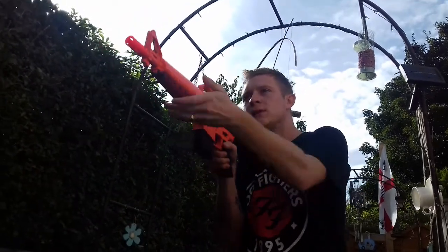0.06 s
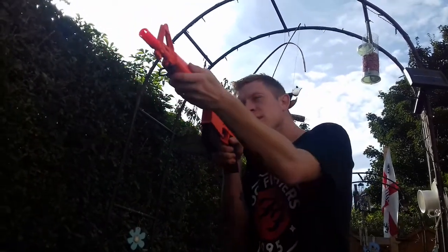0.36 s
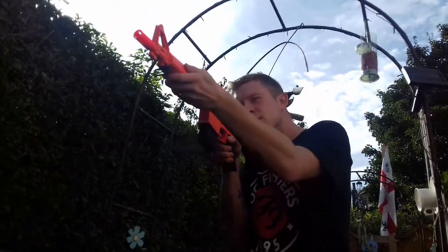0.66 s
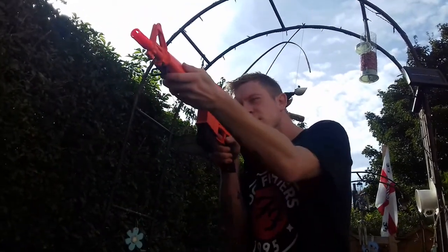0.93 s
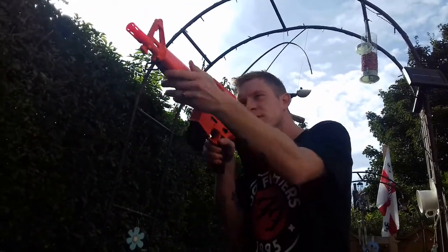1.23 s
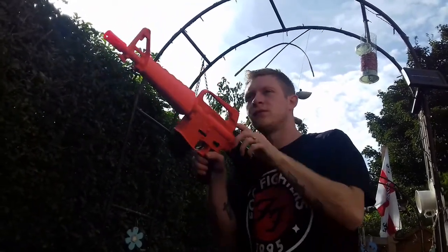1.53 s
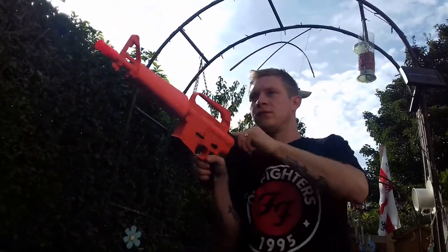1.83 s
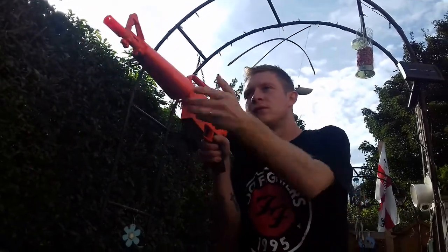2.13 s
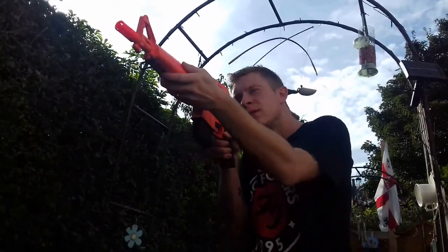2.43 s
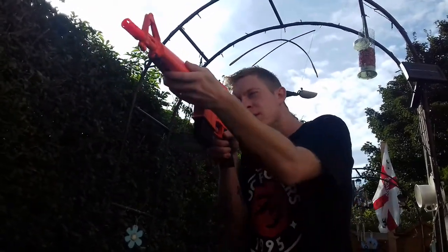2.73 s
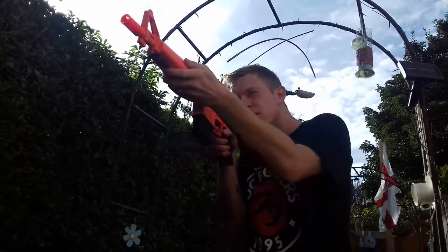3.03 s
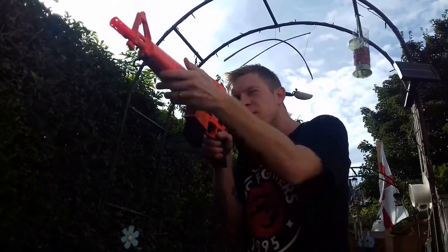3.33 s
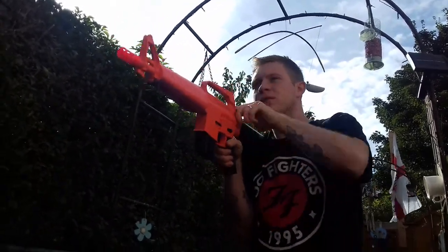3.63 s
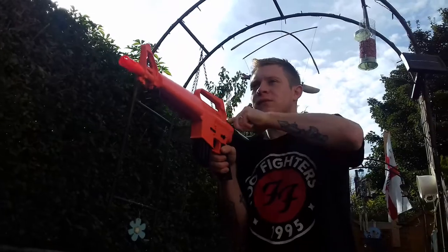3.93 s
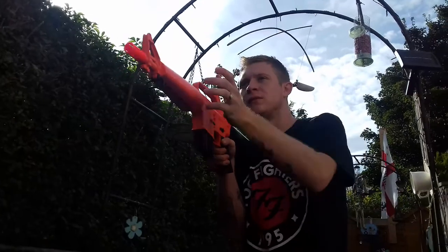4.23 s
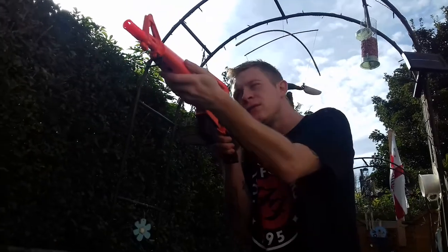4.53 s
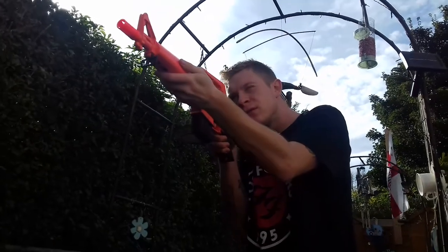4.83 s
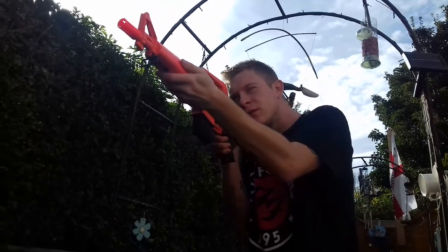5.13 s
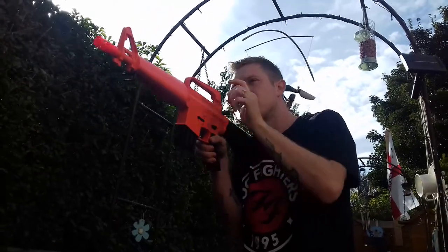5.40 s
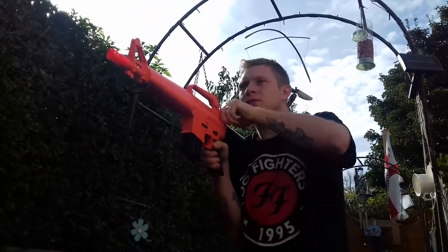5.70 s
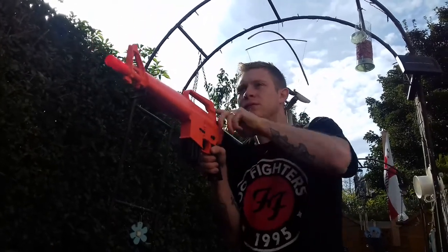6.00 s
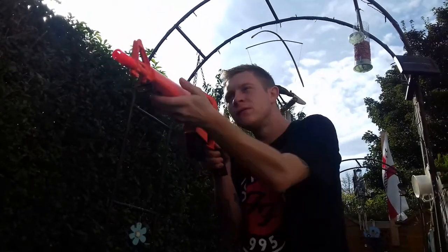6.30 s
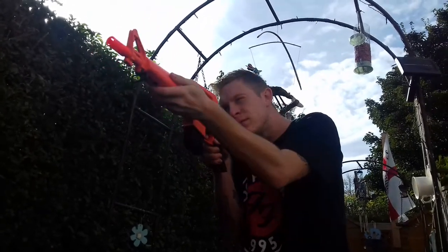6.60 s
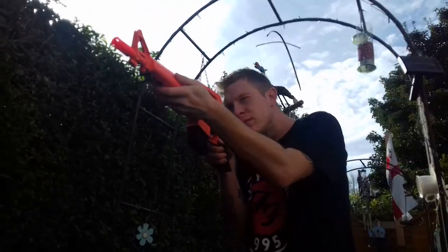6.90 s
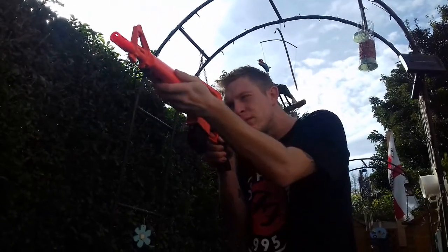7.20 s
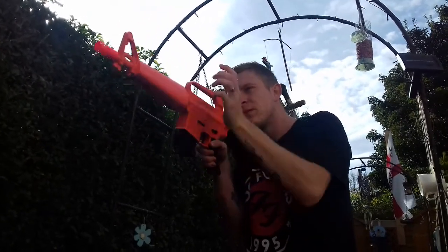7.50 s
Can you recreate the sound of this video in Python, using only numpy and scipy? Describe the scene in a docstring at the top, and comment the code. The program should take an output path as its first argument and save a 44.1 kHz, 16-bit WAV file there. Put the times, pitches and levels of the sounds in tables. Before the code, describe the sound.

A plastic spring BB rifle fires four sharp pops in a quiet garden, pellets smacking a panel, with clicking cocks between shots.

```python
"""Spring BB rifle in a garden

A plastic spring BB rifle is fired four times and cocked between the shots. Each shot is a trigger tick
and the slam of the piston; a tenth of a second later the pellet smacks into a panel. Cocking is a run
of clicks over a scraping slide, then the slide bangs home and the spring rings on.
Soft knocks, a distant hush and a light breeze fill the gaps."""
import sys
import numpy as np
from scipy import signal
from scipy.fft import rfft, irfft
from scipy.io import wavfile
from scipy.ndimage import uniform_filter1d

SR = 44100
rng = np.random.default_rng(int(sys.argv[2]) if len(sys.argv) > 2 else 0)


def waveform_to_disk(signal):
    """Save audio, clipped to [-1, 1], as 16-bit WAV at the path in sys.argv[1]."""
    frames = np.transpose(np.atleast_2d(signal))
    scaled = np.clip(frames, -1, 1) * 32767
    samples = np.round(scaled).astype(np.int16)
    wavfile.write(sys.argv[1], SR, samples)


N = 332955

# A "fade time" (t60 in the code) is how long a sound takes to drop by 60 dB.
# piston slams: (time [s], level [dB], rebound delay [s], rebound compared with the slam [dB])
PISTON_SLAMS = [(1.0705, 7.5, 0.0096, -5), (3.259, 9, 0.013, -13.5), (5.2073, 11.5, .0085, -8.5),
                (7.2869, 11.5, 0.021, -14)]
# pellet hits, each on its own spot of the panel: (time [s], level [dB], bass [dB], treble [dB],
# shudder [dB], boom pitch [Hz], boom boost [dB], knock pitch [Hz], knock boost [dB])
PELLET_HITS = [(1.1659, 4.3, -10.5, -4.5, 3, 480, 10, 2120, 6),
               (3.353, 8, -3.5, -2.5, 3.5, 430, 9.5, 1950, 0.5), (5.2963, 7, -16, 8, 0.3, 592, 16, 2200, 5),
               (7.3838, 10, 1.5, 0.5, 3, 262, 17.5, 1660, 3)]
# cockings: (pull starts [s], spring engages [s], latch snaps [s], hand lets go [s],
# slide starts back [s], pulling force [dB], return click [dB])
COCKING_MOVES = [(1.853, 1.9104, 1.941, 2.031, 2.099, -4.7, -4),
                 (3.921, 3.985, 4.03, 4.134, 4.2071, 0, 4.5),
                 (5.814, 5.9085, 5.956, 6.057, 6.127, 2.8, 2.5)]
# fingers tapping the plastic as the grip changes: (time [s], level [dB], treble [dB])
FINGER_TAPS = [(1.7, -23.5, -6), (1.731, -27.5, -16.5), (3.735, -16.5, -7.5), (5.638, -22, 17),
               (7.169, -24.5, 0.5)]
# the slide banging home:
# (time [s], level [dB], rebound delay [s], relative rebound level [dB], relative spring level [dB])
SLIDE_SLAMS = [(-.018, 11.5, 0.0048, -10, -24.5), (2.1144, 9.3, 0.0076, -1.5, -17),
               (4.2339, 7, .005, -6.5, -30), (6.150, 11.3, .004, -5, -25)]
# the clearer soft knocks and creaks: (time [s], level [dB], pitch [Hz], width [Hz], fade time [s])
SOFT_KNOCKS = [(.241, -30, 3380, 1200, 0.057), (0.332, -25.5, 1430, 250, 0.13), (.385, -24, 1205, 90, 0.27),
               (.549, -28, 780, 120, 0.17), (0.751, -25.5, 750, 500, .1), (.754, -25.5, 2420, 500, 0.2),
               (3.119, -27.5, 800, 690, 0.073), (5.483, -22, 900, 500, 0.033), (5.708, -23, 1504, 300, .1),
               (6.18, -3.5, 850, 1000, 0.34), (6.76, -20.5, 1020, 593, 0.17), (6.957, -19, 547, 398, 0.064),
               (7.179, -22.5, 1295, 250, .1)]

# the tone of each source, from low to high: (pitch [Hz], level [dB])
PISTON_TONE = [(47, -61), (80, -37.5), (242, -10), (323, -16), (441, -18), (629, -19), (820, -2.5),
               (896, -13.5), (1340, -1.5), (1950, -3), (4050, -6.5), (5770, -20.5), (9820, -34),
               (13400, -38), (16000, -49.5)]
PANEL_TONE = [(47, -62), (80, -33), (190, -17.5), (265, -13.5), (353, -8.5), (504, -8.5), (563, -3.5),
              (718, -4), (839, 1.5), (1140, 1), (1460, 4), (1780, 3), (3960, -4.5), (5280, -17.5),
              (16000, -47)]
CATCH_TONE = [(71, -77), (120, -48.5), (546, -20), (712, -11), (911, -9), (1750, 0), (2640, -9), (3820, -7),
              (5870, -26), (7500, -29.5), (9990, -42), (13300, -44.5), (16000, -49)]
SLIDE_TONE = [(71, -63), (120, -27), (410, -27), (605, -14.5), (930, -13), (1260, -0.5), (2700, -3),
              (3980, -2), (5870, -18), (6770, -20.5), (9590, -42.5), (13000, -33.5), (16000, -45.5)]
SPRING_SHIMMER_TONE = [(600, -23.5), (1300, 1), (2000, 1), (4100, 0), (5600, -14.5), (7500, -12),
                       (9000, -26)]
HUSH_TONE = [(18, -39), (30, -12.5), (79, -8), (184, -9.5), (384, -4.5), (801, -5), (866, -3.5), (1670, -7),
             (2480, -14), (2900, -14.5), (4530, -30), (11700, -32.5), (16000, -34)]
BREEZE_TONE = [(20, -18.5), (50, -7.5), (100, 1.5), (170, -3.5), (300, -19.5), (1000, -49.5)]
# pitches that the hollow body, panel and catches boost or weaken: (pitch [Hz], width [Hz], boost [dB])
BODY_RESONANCES = [(268, 120, 2.5), (370, 70, -2), (470, 60, 8), (530, 60, -1), (740, 90, 1), (880, 68, 0),
                   (997, 28, 6.5), (1040, 90, 1), (1225, 220, 4.5), (1540, 100, -1.5), (1734, 190, 3.5),
                   (2035, 40, -1), (2500, 68, 7), (2520, 140, -6.5), (2550, 37, 2.5), (3400, 200, 2),
                   (3990, 260, 1), (4690, 330, 2), (5900, 650, -7), (9860, 1600, -8), (12800, 1500, 3)]
PANEL_RESONANCES = [(168, 40, 8), (306.3, 25, 6), (363, 25, -4.5), (397, 25, 4.5), (492, 16, 5),
                    (550, 65, 3), (650, 64, 4), (840, 48, 3.5), (1149, 210, -1), (1690, 120, 0.5),
                    (2610, 210, 4.5), (4236, 500, 1.5), (10800, 1200, -9.5), (11950, 2000, 6.5)]
CATCH_RESONANCES = [(735, 160, 4.5), (1920, 300, 3), (13200, 1500, 1)]
# notes of the steel spring, hollow barrel and flexing panel: (pitch [Hz], level [dB], fade time [s])
SPRING_NOTES = [(736, -5.5, 1.1), (1250, -6.5, 0.65), (1744, -1, .9), (1820, -3.5, 0.57), (2200, 1, 0.66),
                (2480, -3, 0.66), (2795, 2.5, 0.45), (3310, -11, 1.1), (3591, -11.5, 0.74), (4140, -4, .6),
                (4350, -8, 0.69)]
BARREL_NOTES = [(1248, 2, .028), (1415, -4, 0.04), (3650, 1.5, 0.011)]
PANEL_FLEX_NOTES = [(252, -2.5, 0.13), (295, -6.5, 0.15), (413.7, -5, 0.16), (503, 2, 0.12),
                    (664, -4, 0.19)]

# how long echoes from hedge and fences last: (pitch [Hz], fade time [s])
GARDEN_FADE_TIMES = [(150, 0.13), (600, .3), (1500, 0.36), (4000, 0.3), (8000, 0.33), (14000, 0.36)]
# rise and fall of the distant hush: (time [s], level [dB])
HUSH_LEVELS = [(0, -65), (.85, -64.5), (1.8, -70), (2.7, -68.5), (3.55, -63.5), (3.88, -70), (4.83, -62.7),
               (5.5, -61.5), (7.55, -61.3)]
# puffs of wind on the microphone: (time [s], peak level [dB], half length [s])
WIND_PUFFS = [(.93, -71, .13), (3.5, -71.5, .17), (4.82, -62, .12), (5.38, -63.5, .12), (6.18, -52, .035),
              (6.56, -64, .04), (7.42, -63, .1)]


def shots(trigger_lead_s=.0062, trigger_db=-10.5, piston_t60=.026, spring_db=-24, pop_db=-1.3):
    """The trigger ticks, the piston hits the end of its cylinder and rebounds; air pops from the barrel."""
    out, muzzle = np.zeros(N), np.zeros(N)
    echoes = garden(near_db=-12.5, scatter_db=-6, far_db=-36.5)
    ring = spring()
    trigger = tone_filter(PISTON_TONE, BODY_RESONANCES, treble_db=-8)
    for s, db, rebound_s, rebound_db in PISTON_SLAMS:
        piston = from_db(db) * tone_filter(PISTON_TONE, vary(BODY_RESONANCES, spread_db=3.5))
        tick = chain(burst(t60=.05, swell_s=.00068), trigger)
        add(out, s - trigger_lead_s, from_db(db + trigger_db) * tick)
        add(out, s, chain(burst(piston_t60, swell_s=.0006), piston))
        add(out, s + rebound_s, from_db(rebound_db) * chain(burst(piston_t60, swell_s=.0023), piston))
        add(out, s, from_db(db + spring_db) * ring)
        add(muzzle, s, from_db(db + pop_db) * ringing(BARREL_NOTES, length_s=.5))
    return chain(out, echoes) + muzzle


def spring(shimmer_db=-4, shimmer_t60=.68, count=70):
    """The steel spring rings long and thin: a few clear notes in a cloud of weak overtones."""
    t = seconds(1)
    pitches = np.linspace(600, 9000, count) + rng.uniform(-60, 60, count)
    overtones = np.sin(2 * np.pi * (pitches[:, None] * t + rng.random((count, 1))))
    cloud = from_db(at_hz(SPRING_SHIMMER_TONE, pitches)) @ overtones
    shimmer = unit_energy(cloud * fade_out(t, shimmer_t60) * fade_in(t, .004))
    return unit_energy(ringing(SPRING_NOTES, length_s=1) + from_db(shimmer_db) * shimmer)


def pellets(boom_width_hz=90, knock_width_hz=450, shudder_lag_s=.003, flex_db=-5,
            wall_echo_s=.0497, echo_db=-8.5):
    """A pellet cracks on the panel, the whole panel shudders and flexes, and a wall echoes the crack."""
    out = np.zeros(N)
    for s, db, bass_db, treble_db, shudder_db, boom_hz, boom_db, knock_hz, knock_db in PELLET_HITS:
        boom_and_knock = [(boom_hz, boom_width_hz, boom_db), (knock_hz, knock_width_hz, knock_db)]
        resonances = list(PANEL_RESONANCES) + boom_and_knock
        panel = from_db(db) * tone_filter(PANEL_TONE, resonances, bass_db, treble_db)
        extra_knock = [(knock_hz, 2 * knock_width_hz, 5)]   # 5 dB more at the struck spot
        spot = from_db(db) * tone_filter(PANEL_TONE, resonances + extra_knock, bass_db, treble_db)
        crack = chain(burst(t60=.018), spot)
        shudder = chain(burst(t60=.16, swell_s=.0035), panel)
        flex = ringing(PANEL_FLEX_NOTES, length_s=.5, swell_s=.0073)
        add(out, s, crack)
        add(out, s + shudder_lag_s, from_db(shudder_db) * shudder)
        add(out, s, from_db(db + bass_db + flex_db) * flex)
        add(out, s + wall_echo_s, from_db(echo_db) * crack)
    return chain(out, garden(near_db=-21.5, scatter_db=-15, far_db=-42))


def cocking(hardness=.027, sparkle_per_db=.83, roughness_db=5, climb_db=6):
    """Fingers tap; the slide snaps over its catches and rubs along in small slips that grow louder."""
    out, resonances = np.zeros(N), list(BODY_RESONANCES) + list(CATCH_RESONANCES)
    for s, db, treble_db in slide_clicks() + list(FINGER_TAPS):
        shorten = np.exp(-hardness * max(db + 7.5, 0))   # a harder snap is shorter...
        sparkle = [(13000, 12000, sparkle_per_db * (db + 5.5))]   # ...and brighter
        snap = burst(t60=.033 * shorten, swell_s=.0015 * shorten)
        catch = tone_filter(CATCH_TONE, vary(resonances) + sparkle, treble_db=treble_db)
        add(out, s, from_db(db) * chain(snap, catch))
    for start, end, db in slide_scrapes():
        t = seconds(end - start)
        grip = np.repeat(rng.standard_normal(len(t)), 32)[:len(t)]   # changes every 32 samples
        slips = rng.standard_normal(len(t)) * from_db(roughness_db * grip + climb_db * t / (end - start))
        scrape = chain(slips / np.std(slips), tone_filter(CATCH_TONE, resonances, treble_db=4.5))
        add(out, start, from_db(db) * scrape)
    return chain(out, garden(near_db=-12, scatter_db=-16, far_db=-38))


def slide_clicks(tick_gap_s=.022, slack_db=-20.5, climb_db=8, bounce_s=.0158,
                 engage_db=-2.3, latch_db=5.2, let_go_db=-7):
    """List the clicks of the slide's pull and return as (time [s], level [dB], treble [dB])."""
    clicks = []
    for pull_s, engage_s, latch_s, let_go_s, return_s, force_db, return_db in COCKING_MOVES:
        # the loose slide ticks, louder as the slack runs out
        slack_s = engage_s - pull_s
        for progress in np.linspace(0, 1, round(slack_s / tick_gap_s), endpoint=False):
            tick_db = slack_db + progress * (climb_db + force_db)
            clicks.append((pull_s + progress * slack_s, tick_db, rng.normal(-4.5, 4)))
        # engaging the spring and letting go both strike twice
        for s, db, bounce_db in ((engage_s, engage_db, -3.5), (let_go_s, let_go_db, 1.5)):
            clicks.append((s, force_db + db, -5.5))
            clicks.append((s + bounce_s, force_db + db + bounce_db, -2.5))
        clicks.append((latch_s, force_db + latch_db, 3.5))   # the latch is the bright one
        clicks.append((return_s, return_db, -2))
    return clicks


def slide_scrapes(pull_db=-36, rub_per_force=1.4, lag_s=.01, return_db=-28, lead_s=.0035, tail_s=.027):
    """The slide rubs as it squeezes the spring and on its way home: (start [s], end [s], level [dB])."""
    scrapes = []
    for _, engage_s, latch_s, _, return_s, force_db, _ in COCKING_MOVES:
        scrapes.append((engage_s + lag_s, latch_s + lag_s / 2, pull_db + rub_per_force * force_db))
        scrapes.append((return_s - lead_s, return_s + tail_s, return_db))
    return scrapes


def slide_slams(t60=.026, low_cut_hz=150):
    """The slide hits its stop, rebounds and shakes the spring; the light body gives no bass."""
    out = np.zeros(N)
    body = tone_filter(SLIDE_TONE, BODY_RESONANCES)
    echoes = garden(near_db=-14, scatter_db=-14.5, far_db=-36)
    response = let_through(chain(body, echoes), "high", low_cut_hz)
    for s, db, rebound_s, rebound_db, spring_db in SLIDE_SLAMS:
        add(out, s, from_db(db) * chain(burst(t60, swell_s=.00048), response))
        add(out, s + rebound_s, from_db(db + rebound_db) * chain(burst(t60), response))
        add(out, s, from_db(db + spring_db) * spring())
    return out


def knocks(rustle_db=-42, spread_db=11, tilt_db=2, rustle_count=70):
    """Soft knocks, with rustles scattered between them: most are faint, a few stand out."""
    out = np.zeros(N)
    for s, db, hz, width, t60 in SOFT_KNOCKS:
        add(out, s, from_db(db) * knock(hz, width, t60))
    for when, pitch, size in rng.random((rustle_count, 3)):
        hz = 500 * 6 ** pitch   # 500 to 3000 Hz
        db = rustle_db + spread_db * size ** 2 - tilt_db * pitch
        add(out, when * N / SR, from_db(db) * knock(hz, hz / 6, t60=.15))
    return out


def knock(hz, width, t60):
    """One dull contact: a burst of noise that rings around one pitch."""
    ring = signal.lfilter(*signal.iirpeak(hz, hz / width, fs=SR), burst(t60, swell_s=.004))
    return unit_energy(let_through(ring, "low", hz + width, order=4))


def garden(near_db, scatter_db, far_db):
    """How the garden answers a click: close echoes, scatter from hedge and fences, a dull far tail."""
    t, edges_hz = seconds(1), np.geomspace(60, 18000, 12)
    noise, scatter = rng.standard_normal((2, len(t))), 0
    for k, (low, high) in enumerate(zip(edges_hz, edges_hz[1:])):
        band = let_through(noise[k % 2], "band", [low, high])
        scatter = scatter + band * fade_out(t, at_hz(GARDEN_FADE_TIMES, np.sqrt(low * high)))
    far = let_through(rng.standard_normal(len(t)), "low", hz=3000) * fade_out(t, t60=1.4)
    response = from_db(scatter_db) * unit_energy(scatter * fade_in(t, .012))
    response += from_db(far_db) * unit_energy(far * fade_in(t, .04))
    add(response, .007, from_db(near_db) * burst(t60=.09))
    response[0] += 1   # the direct sound
    return response


def air(hush_waver_db=1.64, breeze_waver_db=3, calm_db=-84):
    """A distant hush that wavers slightly, and a light breeze that puffs on the microphone."""
    t, moments = np.arange(N) / SR, np.arange(0, N / SR, .05)
    hush_waver = np.interp(t, moments, rng.normal(0, hush_waver_db, len(moments)))
    breeze_waver = np.interp(t, moments, rng.normal(0, breeze_waver_db, len(moments)))
    hush_gain = from_db(np.interp(t, *np.transpose(HUSH_LEVELS)) + hush_waver)
    puffs = sum(from_db(db) * np.exp(-((t - s) / half_s) ** 2) for s, db, half_s in WIND_PUFFS)
    breeze_gain = (from_db(calm_db) + puffs) * from_db(breeze_waver)
    hush = chain(rng.standard_normal(N), tone_filter(HUSH_TONE))
    breeze = chain(rng.standard_normal(N), tone_filter(BREEZE_TONE))
    return hush_gain * hush + breeze_gain * breeze


def burst(t60, swell_s=.000097, size=8192):
    """The noise of two things meeting: it swells, dies away and holds all pitches about equally."""
    t = np.arange(size) / SR
    spectrum = rfft(rng.standard_normal(size) * fade_in(t, swell_s) * fade_out(t, t60), 2 * size)
    spectrum /= np.sqrt(uniform_filter1d(np.abs(spectrum) ** 2, size=60) + 1e-20)   # even it out
    return unit_energy(irfft(spectrum)[:size])


def ringing(notes, length_s, swell_s=.0008, spread_db=1.3):
    """Fading notes set off by one blow, each a little stronger or weaker, with the deep bass cut."""
    t = seconds(length_s)
    rings = sum(from_db(db + rng.normal(0, spread_db)) * np.sin(2 * np.pi * hz * t) * fade_out(t, t60)
                for hz, db, t60 in notes)
    lowest_hz = notes[0][0]
    return unit_energy(let_through(rings * fade_in(t, swell_s), "high", .6 * lowest_hz))


def vary(resonances, spread_db=2.5):
    """Each blow lands on another spot and wakes the resonances differently."""
    return [(hz, width, boost + rng.normal(0, spread_db)) for hz, width, boost in resonances]


def tone_filter(tone, resonances=(), bass_db=0, treble_db=0, bass_hz=900, treble_hz=2900, size=4096):
    """How an object answers a click, given its tone, its resonances and bass and treble controls."""
    hz = np.fft.rfftfreq(size, 1 / SR)
    db = at_hz(tone, hz)
    db += sum(boost / (1 + (2 * (hz - pitch) / width) ** 2) for pitch, width, boost in resonances)
    db += bass_db / (1 + (hz / bass_hz) ** 4)
    db += treble_db * (1 - 1 / (1 + (hz / treble_hz) ** 4))
    # keep this tone, but make all the ringing come after the click (minimum phase)
    cepstrum = irfft(np.log(from_db(db)))
    cepstrum[1:size // 2] *= 2
    cepstrum[size // 2 + 1:] = 0
    return unit_energy(irfft(np.exp(rfft(cepstrum))))


def chain(sound, response):
    """Pass a sound through the response of an object or of the garden."""
    return signal.oaconvolve(sound, response)[:N]


def let_through(sound, kind, hz, order=2):
    """Keep the pitches below hz ("low"), above it ("high") or between two values ("band")."""
    return signal.sosfilt(signal.butter(order, hz, kind, fs=SR, output="sos"), sound)


def add(out, s, sound):
    """Mix a sound in from time s on."""
    start = round(s * SR)
    piece = sound[max(-start, 0):N - start]
    out[max(start, 0):max(start, 0) + len(piece)] += piece


def at_hz(points, hz):
    """Read a table at any pitch, gliding between its rows."""
    pitches, values = np.transpose(points)
    return np.interp(np.log(hz + 1), np.log(pitches), values)


def fade_in(t, swell_s):
    return 1 - np.exp(-t / swell_s)


def fade_out(t, t60):
    return np.exp(-np.log(1000) * t / t60)


def from_db(db):
    return 10 ** (np.asarray(db) / 20)


def unit_energy(x):
    return x / np.sqrt(np.sum(x ** 2) + 1e-20)


def seconds(length):
    return np.arange(int(length * SR)) / SR


def scene():
    """Rifle, target and garden mixed into one channel."""
    return (shots() + pellets() + cocking() + slide_slams() + knocks() + air())[None]


def record(dry, ceiling=.95, cutoff_hz=16000):
    """Round off the loudest peaks and cut the highest treble."""
    rounded = dry / (1 + (dry / ceiling) ** 6) ** (1 / 6)
    return signal.sosfilt(signal.ellip(10, .1, 70, cutoff_hz, fs=SR, output="sos"), rounded)


dry = scene()
out = record(dry)
waveform_to_disk(out)
```